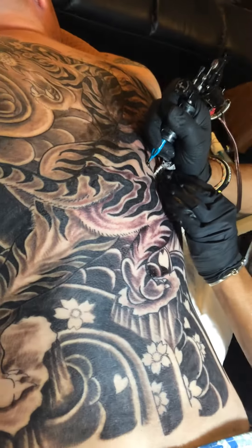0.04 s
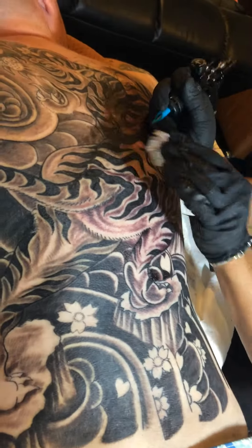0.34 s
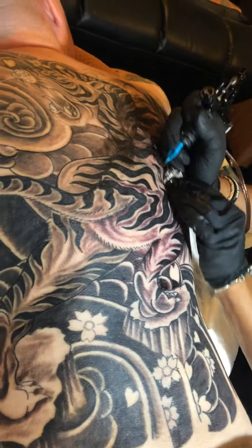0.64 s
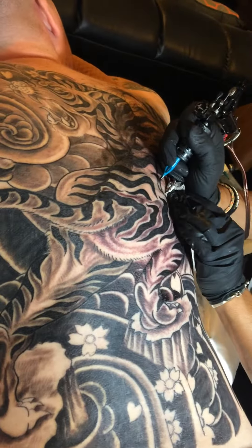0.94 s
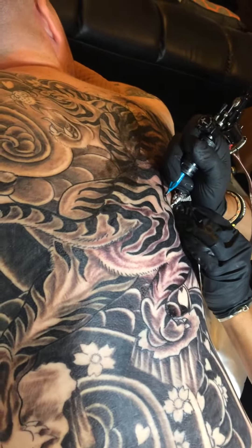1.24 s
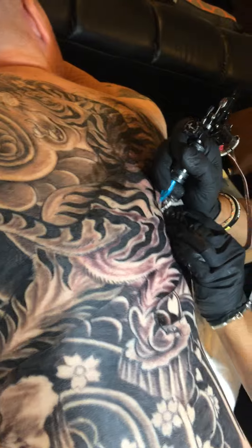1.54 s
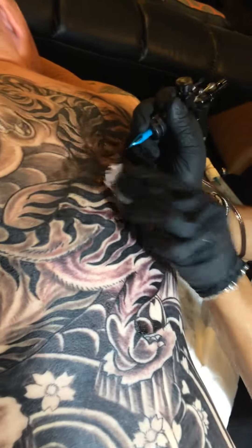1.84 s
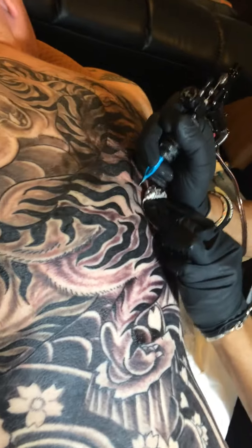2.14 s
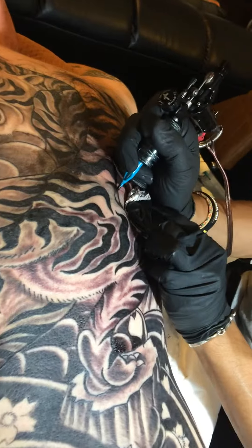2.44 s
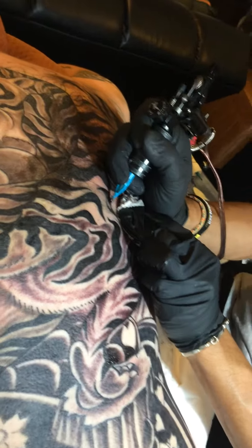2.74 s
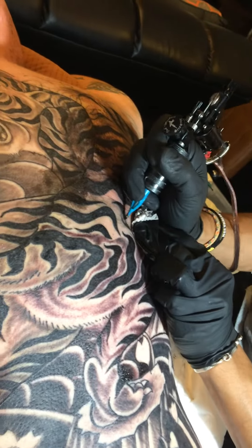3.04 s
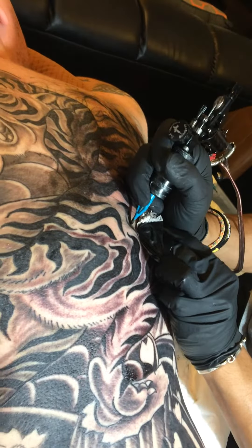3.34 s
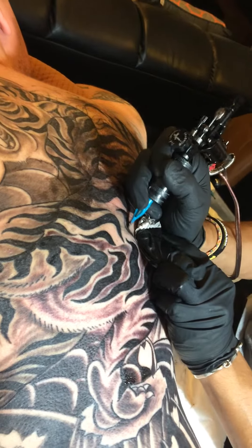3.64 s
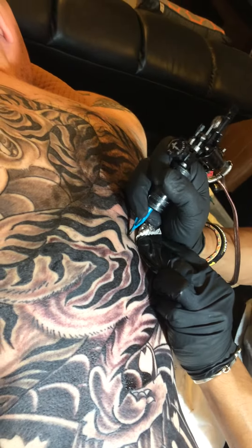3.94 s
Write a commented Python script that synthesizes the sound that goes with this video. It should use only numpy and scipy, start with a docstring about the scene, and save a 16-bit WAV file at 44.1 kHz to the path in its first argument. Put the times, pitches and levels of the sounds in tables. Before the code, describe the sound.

A tattoo machine buzzes continuously, close by in a small room, with a bright metallic edge. It goes quieter and thinner as the needle lifts at about 0.3 to 0.8 seconds, and again from 1.8 to 2.3. From around 2.6 seconds until the end at 4, it presses into the skin, with small repeated dips in pitch and a rougher rattle. A low ventilation rumble lies underneath throughout.

```python
"""A coil tattoo machine buzzes against skin, close by in a small room, over a low ventilation rumble.
Its armature strikes the coils about 98 times a second, rebounds, then taps the contact screw on the
way up; this periodic train of impacts drives the resonances of the frame. Lifted from the skin it is
quieter and thinner; pressed in with small circling moves it slows and rattles."""
import sys
import numpy as np
from scipy import signal
from scipy.fft import rfft, irfft
from scipy.io import wavfile

SR = 44100
rng = np.random.default_rng(int(sys.argv[2]) if len(sys.argv) > 2 else 0)


def digitize_waveform(pressure):
    """Quantize a signal to 16-bit integers and store it at the path in sys.argv[1].

    Rows of a 2-D input are taken as channels; values are limited to [-1, 1].
    """
    field = np.atleast_2d(pressure).T
    bounded = np.clip(field, -1, 1)
    quanta = np.round(bounded * 32767).astype(np.int16)
    wavfile.write(sys.argv[1], SR, quanta)


N = 176400

# stroke rate, which sags as the needle drags: (time [s], rate [Hz])
STROKE_RATE = [(0.0, 97.34), (0.15, 97.57), (0.23, 98.82), (0.3, 96.91), (0.37, 99.04), (0.66, 99.2),
               (1.53, 98.38), (1.66, 98.73), (1.73, 97.73), (1.85, 99.17), (2.43, 99.12), (2.6, 97.48),
               (2.66, 97.87), (2.75, 96.66), (2.82, 97.88), (2.9, 95.88), (2.97, 97.84), (3.06, 94.97),
               (3.14, 97.4), (3.22, 94.72), (3.29, 97.48), (3.37, 95.03), (3.47, 97.24), (3.57, 93.35),
               (3.66, 97.69), (3.75, 93.63), (3.83, 96.29), (3.91, 92.46), (4.0, 97.29)]
# contact of needle and skin: (time [s], contact [0-1])
SKIN_CONTACT = [(0, 0.96), (.26, 0.9), (.35, 0.25), (.6, 0.34), (.82, 0.93), (1.71, 1), (1.79, 0.17),
                (2.1, 0.16), (2.32, 1), (4, 1)]
# strength of the strokes: (time [s], gain [dB])
STROKE_FORCE = [(0, -1.5), (.3, -0.5), (.5, -0.5), (.74, 0), (.95, -.7), (1.65, .7), (1.9, 0.1),
                (2.25, 2.5), (2.55, 1.45), (2.8, 0.5), (3.4, 0), (4, -0.5)]
# strike, rebound and contact tap: (delay [ms], scatter [ms], lifted [dB], on skin [dB], pressed [dB])
IMPACTS = [(.02, 0.0012, 0, 2, 3), (.885, 0.016, -16, -10.5, -6), (5.6, 0.142, -13.5, -10, -11)]
# rattle of the needle bar through one stroke: (phase [cycles], relative level [dB])
RATTLE_CYCLE = [(0, 2), (.04, -4.5), (.14, -5.5), (.25, 6.5), (.42, -5.5), (.56, -3), (.7, -40), (.88, -18),
                (1, -5)]
# broad response of frame and tube: (frequency [Hz], lifted [dB], on skin [dB], pressed [dB])
FRAME_RESPONSE = [(500, -43, -32, -34), (1110, -27, -29.5, -36.5), (1440, -23.5, -19, -15.5),
                  (1954, -8, -2.5, -4), (2460, -13.5, -10, -4.5), (2650, -8.5, -6.5, -13.5),
                  (3040, -10.5, -13.5, -7.5), (3330, -9, -7, -9.5), (3900, -2, -3.5, -6),
                  (4430, -16, -17, -9.5), (4830, -3, -10.5, -11.5), (6270, -8.5, -3, 1.5),
                  (6180, -5, -1, 1), (6500, -5.5, -6, -5.5), (7680, -4, -3.5, -2), (8660, -10.5, -7, -6),
                  (10130, -9, -6, -5), (12900, -11, -11, -9), (14900, -10, -10.5, -8)]
# modes of frame and springs: (frequency [Hz], bandwidth [Hz], lifted [dB], on skin [dB], pressed [dB])
FRAME_MODES = [(1162, 52, -32, -29, -18), (1578, 18, -20, -4, -26), (1990, 62, -8.5, 1, -12),
               (2887, 54, 2.5, -10, -4.5), (3174, 47, 0, -6.5, -17), (3486, 36, -21, -6, 1),
               (3690, 31, -2, -7, -27), (3910, 33, 0, -27, -26), (4365, 71, 0.5, -7, -10.5),
               (5115, 66, 0.5, -7, -10), (6910, 140, 1.5, 1.5, -0.5), (7225, 107, 1.5, 2, 0),
               (8100, 80, -6, -2, -18)]
# strength of the clack around CLACK_HZ: (time [s], gain [dB])
CLACK_GAIN = [(0, 0), (.24, 1.5), (.32, -4), (.55, -1), (.74, -6.5), (.9, -2.5), (1.3, 0), (1.6, -1),
              (1.68, -1.5), (1.75, -5), (1.9, -2), (2.2, -6.5), (2.4, -2.5), (2.7, 0), (3.1, 1), (4, 1)]
# reflections from nearby surfaces: (delay [ms], gain [ratio])
REFLECTIONS = [(2.549, 0.064), (3.252, 0.14)]
# spectral density of the ventilation: (frequency [Hz], relative level [dB])
RUMBLE_SPECTRUM = [(20, -17), (33, -14), (48, -3), (63, -5), (80, 0), (120, -2), (160, -2.5), (185, -7),
                   (215, -5.5), (270, -14.5), (400, -16.5), (600, -20), (1200, -20.5), (4000, -23),
                   (15000, -33)]
# swells of the ventilation's bass: (time [s], gain [dB])
BASS_SWELLS = [(0, -3), (.1, 1), (.35, -1), (.58, 0.5), (.95, -0.5), (1.15, 3.5), (1.35, -1.5), (2.3, -0.5),
               (2.65, 1.5), (2.78, 4), (2.95, -0.5), (3.2, 1.5), (3.4, -1), (4, 3)]

FREE_HZ, PRESSED_HZ = 99.5, 97.25  # stroke rates with no load and with the needle pressed in
BUZZ_DB, RATTLE_DB, RATTLE_PRESSED_DB = -31, -38, 1  # balance ahead of STROKE_FORCE
CRACK_HZ, CRACK_PRESSED_HZ = 10600, 8500  # above these frequencies an impact is noise
CLACK_HZ, CLACK_WIDTH_HZ = 2200, 670
RUMBLE_DB, HUM_DB, HUM_HZ = -42, -45.5, 106


def tattoo_machine():
    """A self-interrupting oscillator slows under load, so the sag in rate gives the needle's pressure."""
    rate, contact = curve(STROKE_RATE), np.clip(curve(SKIN_CONTACT), 0, 1)
    cycles = np.cumsum(rate) / SR + .84
    load = np.clip((FREE_HZ - rate) / (FREE_HZ - PRESSED_HZ), 0, 1)
    # shares of the three states: lifted, on skin, pressed
    states = np.array([1 - contact, contact * (1 - load), contact * load])
    drive = armature_impacts(cycles, states) + needle_rattle(cycles, states[2])
    return amp(curve(STROKE_FORCE)) * frame_resonance(drive, states)


def armature_impacts(cycles, states, uneven_db=.5, load_scatter=2.5):
    """Periodic impacts make a harmonic buzz; load scatters their timing and roughens it."""
    starts = np.interp(np.arange(1, int(cycles[-1]) + 1), cycles, np.arange(N)).astype(int)
    pressed = states[2]
    knocks, cracks = np.zeros(N), np.zeros(N)
    for delay_ms, scatter_ms, *state_db in IMPACTS:
        timing, strength = rng.standard_normal((len(starts), 2)).T
        jitter_ms = scatter_ms * (1 + load_scatter * pressed[starts]) * timing
        sizes = amp(np.array(state_db) @ states[:, starts] + uneven_db * strength)
        ticks = clicks(starts / SR + (delay_ms + jitter_ms) / 1000, sizes)
        knocks += ticks
        cracks += impact_crack(ticks)
    knocks = metal_dispersion(knocks)
    unloaded = crossover(knocks, cracks, CRACK_HZ)
    loaded = crossover(knocks, cracks, CRACK_PRESSED_HZ)
    return amp(BUZZ_DB) * unit_rms((1 - pressed) * unloaded + pressed * loaded)


def impact_crack(ticks, length_ms=1.37):
    """Incoherent excitation: each impact's energy is spread over a burst of fresh noise."""
    t_ms = np.arange(200) * 1000 / SR
    burst = np.exp(-(2 * t_ms / length_ms - 1) ** 4)
    power = abs(signal.oaconvolve(ticks ** 2, burst / burst.sum())[:N])
    return np.sqrt(power) * np.sign(rng.standard_normal(N))


def metal_dispersion(knocks, longest_ms=.902, points=22):
    """Dispersion spreads an impact: each frequency leaves the metal after its own short delay."""
    hz = np.fft.rfftfreq(N, 1 / SR)
    group_delay = np.interp(hz, np.linspace(0, SR / 2, points), rng.random(points)) * longest_ms / 1000
    phase = 2 * np.pi * np.cumsum(group_delay) * SR / N
    return irfft(rfft(knocks) * np.exp(-1j * phase), N)


def needle_rattle(cycles, pressed):
    """Amplitude-modulated noise: the loose needle bar chatters with each stroke, more under load."""
    envelope = amp(np.interp(cycles % 1, *np.transpose(RATTLE_CYCLE)))
    chatter = crossover(np.zeros(N), envelope * rng.standard_normal(N), hz=2560)
    return amp(RATTLE_DB + RATTLE_PRESSED_DB * pressed) * unit_rms(chatter)


def frame_resonance(drive, states):
    """Forced vibration: the frame's modes filter the drive, with different weights in each state."""
    hz, *broad_db = np.transpose(FRAME_RESPONSE)
    f = abs(np.fft.fftfreq(4096, 1 / SR))
    sound = np.zeros(N)
    for k, share in enumerate(states):
        mode_power = sum(amp(db[k]) ** 2 / (1 + (2 * (f - centre) / width) ** 2)
                         for centre, width, *db in FRAME_MODES)
        gain = np.sqrt(spectrum(hz, broad_db[k], f) ** 2 + mode_power)
        sound += share * minimum_phase(drive, gain)
    band = np.exp(-((np.fft.rfftfreq(N, 1 / SR) - CLACK_HZ) / CLACK_WIDTH_HZ) ** 4)
    clack = irfft(rfft(sound) * band, N)
    sound += (amp(curve(CLACK_GAIN)) - 1) * clack
    return unit_rms(sound) * np.std(drive)


def room(direct, tail_db=-7.5, t60_s=.27, onset_s=.0033, hand_hz=1.6):
    """Reverberation: two early reflections, then a diffuse tail that changes as the hand moves."""
    t = np.arange(SR // 2) / SR
    delay_ms, gain = np.transpose(REFLECTIONS)
    sound = direct + signal.oaconvolve(direct, clicks(delay_ms / 1000, gain)[:len(t)])[:N]
    positions = np.array([drift(hand_hz) for _ in range(5)])
    for share in positions / np.linalg.norm(positions, axis=0):
        tail = rng.standard_normal(len(t)) * amp(-60 * t / t60_s) * (t > onset_s)
        sound += amp(tail_db) * signal.oaconvolve(direct * share, tail / np.linalg.norm(tail))[:N]
    return sound


def ventilation(hum_waver=.9, swell_db=.8):
    """Superposition of broadband rumble and a wavering narrowband hum; the bass swells and ebbs."""
    gain = spectrum(*np.transpose(RUMBLE_SPECTRUM), np.fft.rfftfreq(N, 1 / SR))
    rumble = irfft(rfft(rng.standard_normal(N)) * gain, N)
    waver = 1 + hum_waver * (drift(rate_hz=2) + 1j * drift(rate_hz=3.4))
    hum = (waver * np.exp(2j * np.pi * HUM_HZ * np.arange(N) / SR)).real
    air = amp(RUMBLE_DB) * unit_rms(rumble) + amp(HUM_DB) * unit_rms(hum)
    swell = amp(curve(BASS_SWELLS) + swell_db * drift(rate_hz=5.4))
    bass = crossover(air, np.zeros(N), hz=125)
    return air + (swell - 1) * bass


def amp(db):
    """Amplitude ratio of a level in decibels."""
    return 10 ** (np.asarray(db) / 20)


def unit_rms(x):
    """Normalisation to unit mean power."""
    return x / np.sqrt(np.mean(x ** 2) + 1e-20)


def curve(points):
    """Linear interpolation of (time [s], value) points at every sample."""
    return np.interp(np.arange(N) / SR, *np.transpose(points))


def spectrum(hz, db, at_hz):
    """Gain from levels interpolated on a logarithmic frequency axis."""
    return amp(np.interp(np.log(at_hz + 1), np.log(hz), db))


def drift(rate_hz):
    """Low-passed noise: a slow random fluctuation of unit power."""
    rolloff = 1 + (np.fft.rfftfreq(N, 1 / SR) / rate_hz) ** 4
    return unit_rms(irfft(rfft(rng.standard_normal(N)) / rolloff, N))


def minimum_phase(x, gain):
    """Causal filter: the Hilbert transform of the log gain gives its phase."""
    log_response = np.conj(signal.hilbert(np.log(gain + 1e-5)))
    return signal.oaconvolve(x, np.fft.ifft(np.exp(log_response)).real)[:N]


def clicks(times, sizes, half_width=8):
    """Band-limited impulses: windowed sinc pulses can fall between samples."""
    at = times[:, None] * SR
    near = np.floor(at).astype(int) + np.arange(1 - half_width, half_width + 1)
    shape = np.sinc(near - at) * np.cos(np.pi * (near - at) / (2 * half_width)) ** 2
    return np.bincount(np.clip(near, 0, N).ravel(), (shape * sizes[:, None]).ravel(), N + 1)[:N]


def crossover(low, high, hz):
    """Power-complementary filters pass one sound below hz and another above it."""
    share = 1 / (1 + (np.fft.rfftfreq(N, 1 / SR) / hz) ** 4)
    return irfft(rfft(low) * np.sqrt(share) + rfft(high) * np.sqrt(1 - share), N)


def scene():
    """Sound pressures add: the machine in its room and the ventilation, in one channel."""
    return (room(tattoo_machine()) + ventilation())[None]


def record(dry, cutoff_hz=15450):
    """Band limiting: a steep low-pass filter removes the highest treble."""
    lowpass = signal.firwin(301, cutoff_hz, window=("kaiser", 9), fs=SR)
    return signal.oaconvolve(dry, lowpass[None], "same")


dry = scene()
out = record(dry)
digitize_waveform(out)
```